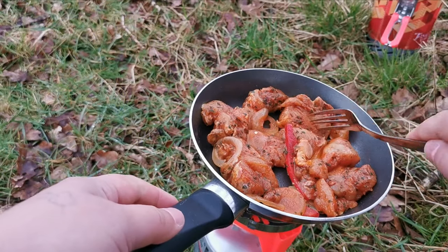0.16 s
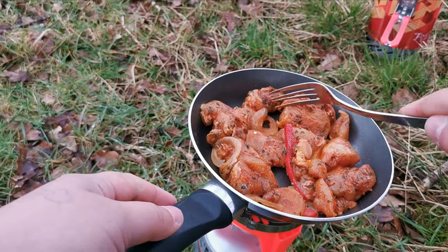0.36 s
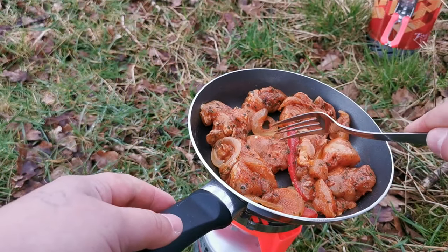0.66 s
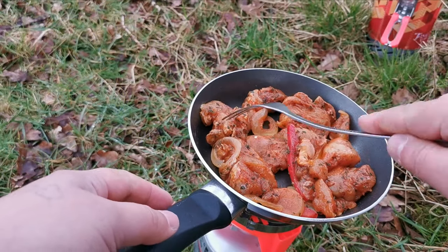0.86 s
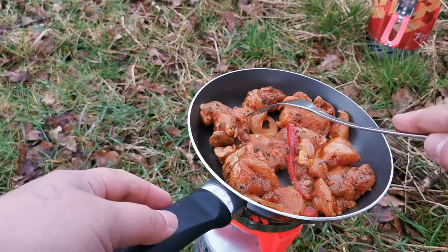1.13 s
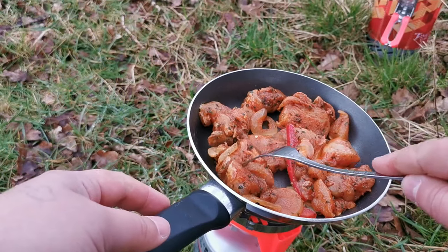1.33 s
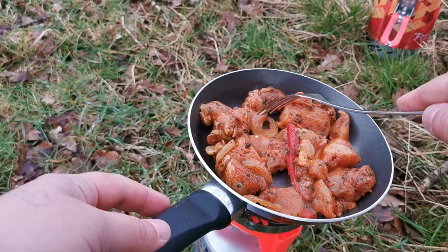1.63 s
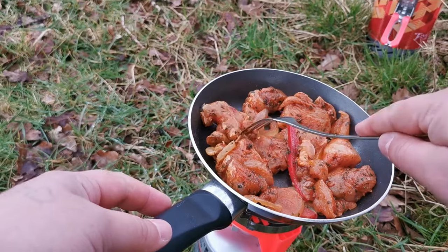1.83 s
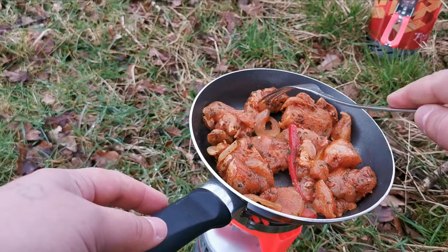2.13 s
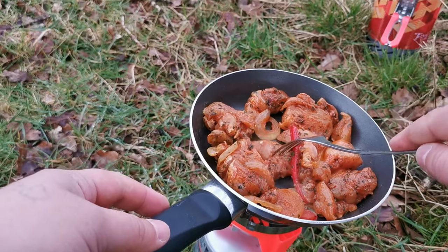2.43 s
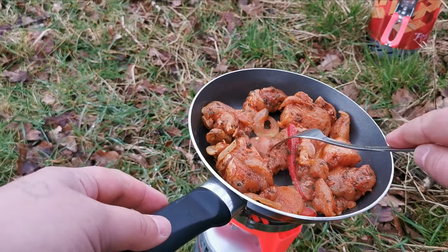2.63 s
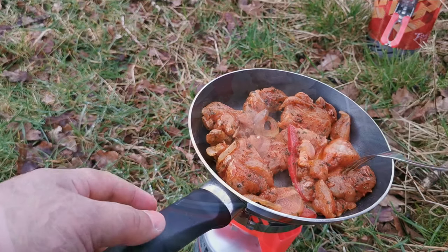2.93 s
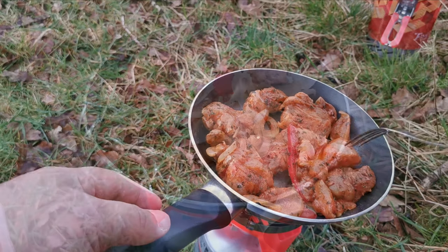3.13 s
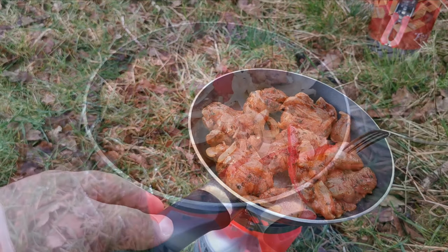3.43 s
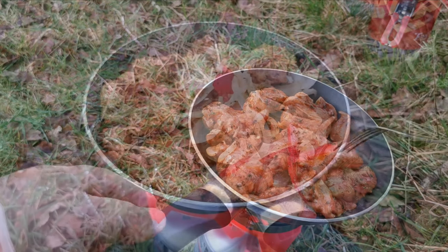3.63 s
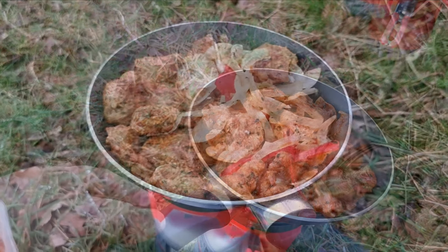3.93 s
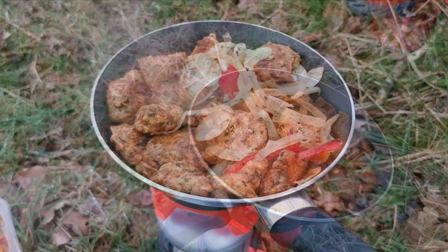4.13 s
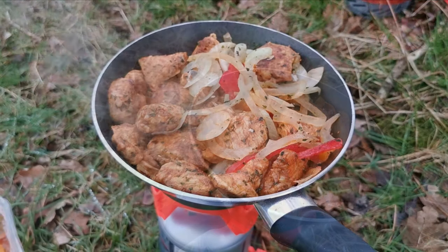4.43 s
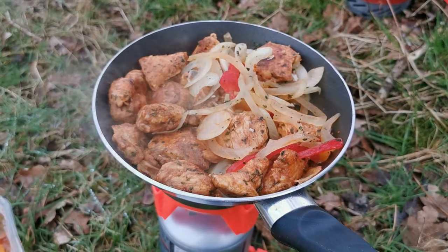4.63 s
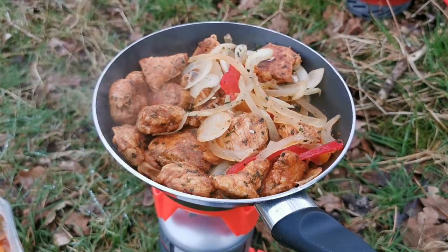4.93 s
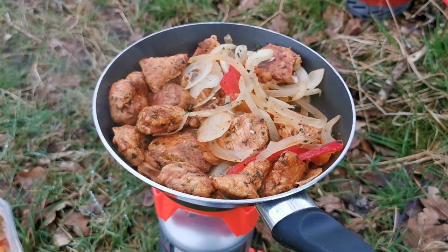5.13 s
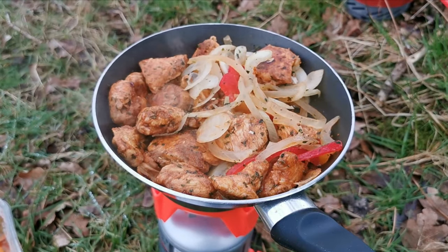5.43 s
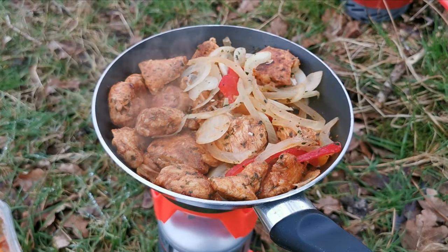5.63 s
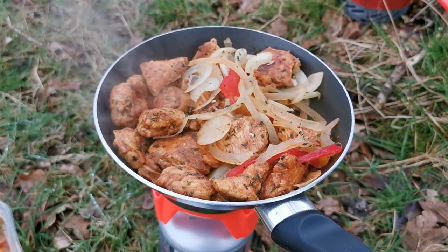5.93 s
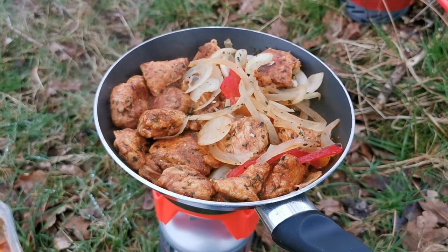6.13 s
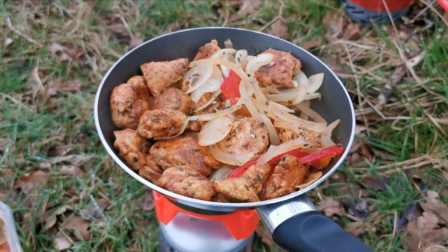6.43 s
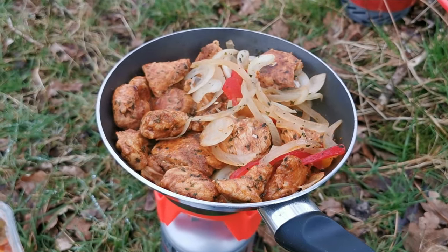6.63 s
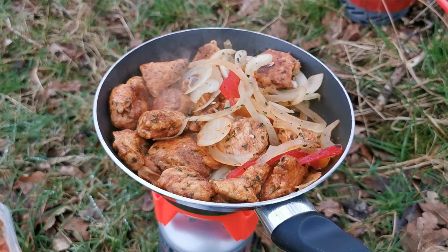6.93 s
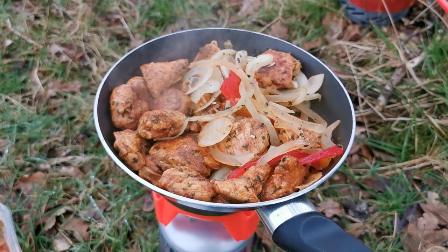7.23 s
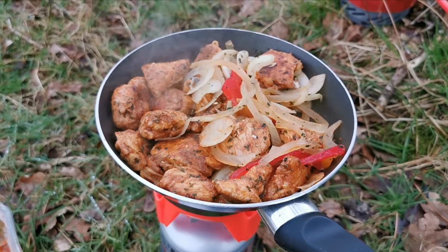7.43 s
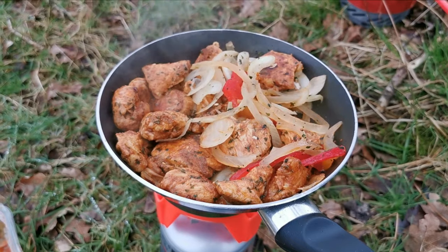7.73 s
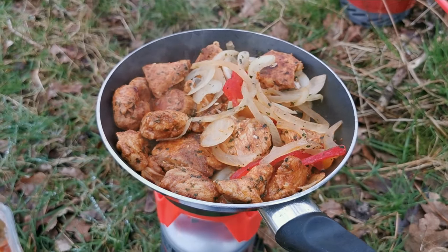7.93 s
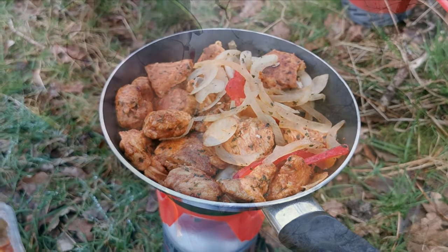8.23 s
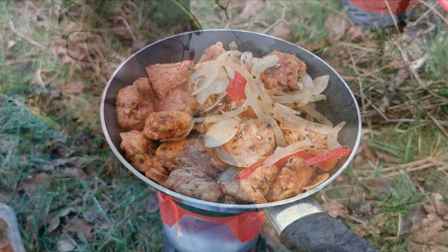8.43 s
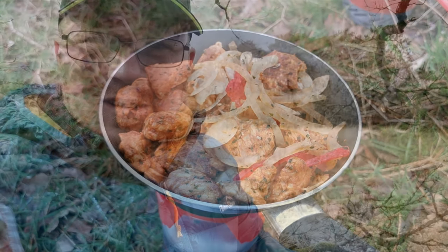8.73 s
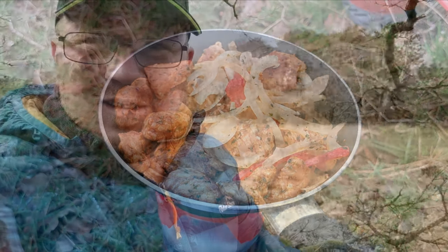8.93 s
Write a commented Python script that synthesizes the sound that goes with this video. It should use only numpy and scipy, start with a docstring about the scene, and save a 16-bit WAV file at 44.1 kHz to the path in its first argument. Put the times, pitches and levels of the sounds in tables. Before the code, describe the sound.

Two views of frying on a portable burner on grass. First a quiet, centred, muffled sizzle over an airy flame, with sparse ticks and thin gritty fork presses. Then, suddenly, a near and wide stereo sizzle: fat snaps and crackles constantly while the flame roars and flutters low, leaning left. Finally, after a short silence, very faint low wind on the microphone.

```python
"""A quiet sizzle from further off, then a close one with a roaring, humming flame, then wind on the microphone.
Meat fries in a small pan on a gas stove on the grass, in three shots parted by short silences.
Flame and wind are filtered noise; the flame's hum is a wavering tone and its octave.
Spitting fat is many short rings in clumps over a fizz; pops and ticks add a snap, a thud and a spray.
In the far shot a fork also presses the meat, and gritty noise flares in narrow gliding bands."""
import sys
import numpy as np
from scipy import signal
from scipy.fft import rfft, irfft, next_fast_len
from scipy.io import wavfile

SR = 44100
rng = np.random.default_rng(int(sys.argv[2]) if len(sys.argv) > 2 else 0)


def transcribe(u):
    """Save the signal u as a 16-bit wav file named by the first command-line argument.

    u: samples, shape (n,) or (channels, n), limited to [-1, 1]; the rate is SR.
    q: integer samples, one column per channel.
    """
    v = np.clip(np.atleast_2d(u).T, -1, 1)
    q = np.round(v * 32767).astype(np.int16)
    wavfile.write(sys.argv[1], SR, q)


def convert_level_to_amplitude(level_db):
    """Map a level in decibels to its linear amplitude factor."""
    exponent = np.asarray(level_db, float) / 20
    return 10 ** exponent


N = 399987     # samples in the whole scene

# shots: (start [s], end [s])
FAR_SHOT, NEAR_SHOT, AIR_SHOT = (0, 3.767), (3.799, 8.866), (8.9, 9.07)
RIGHT_LAG_MS = 0.259     # the right microphone hears the pan later


def rms_one(x):
    """Scale so that the mean of the channels has rms 1."""
    mono = np.mean(np.atleast_2d(x), axis=0)
    return x / np.sqrt(np.mean(mono ** 2) + 1e-20)


def span(shot):
    """Sample times of a shot, in seconds."""
    return np.arange(round(shot[0] * SR), min(round(shot[1] * SR), N)) / SR


def in_time(rows, t):
    """Columns of a table read at times t, with straight lines between the rows."""
    s, *columns = np.transpose(rows)
    return [np.interp(t, s, c) for c in columns]


def drift(rate, count):
    """Slow random wandering of spread 1: noise at every 40th sample through two equal low-passes at rate Hz."""
    r = np.exp(-80 * np.pi * rate / SR)
    noise = rng.standard_normal(count // 40 + 2002)
    slow = signal.lfilter([1], [1, -2 * r, r * r], noise)[2000:]     # the start-up is dropped
    return np.interp(np.arange(count) / 40, np.arange(len(slow)), rms_one(slow))


def narrow(phase, blur_hz):
    """Noise in a narrow band that rides on the given phase."""
    return drift(blur_hz, len(phase)) * np.cos(phase) + drift(blur_hz, len(phase)) * np.sin(phase)


def late(x, ms):
    """Delay by ms milliseconds, read between samples."""
    n = np.arange(len(x))
    return np.interp(n - ms * SR / 1000, n, x, left=0)


def colour(x, table, below_db, above_db):
    """Causal (minimum-phase) filter, one output per dB column; outside the table it slopes by dB per octave."""
    size = 8192
    octave = np.log2(np.maximum(np.fft.rfftfreq(size, 1 / SR), 5))
    hz, *columns = np.transpose(table)
    known = np.log2(hz)
    slope = below_db * np.maximum(known[0] - octave, 0) + above_db * np.maximum(octave - known[-1], 0)
    gain_db = np.array([np.interp(octave, known, c) for c in columns]) + slope
    # folding the cepstrum forward in time gives the minimum phase
    cepstrum = irfft(np.log(convert_level_to_amplitude(gain_db)))
    cepstrum[:, 1:size // 2] *= 2
    cepstrum[:, size // 2 + 1:] = 0
    response = irfft(np.exp(rfft(cepstrum)))
    x = np.atleast_2d(x)
    return signal.oaconvolve(x, response, axes=1)[:, :x.shape[1]]


def still_air():
    """Wind rumble, mostly shared, over the microphones' own faint hiss: one noise colour holds both."""
    # colour of wind and hiss: (frequency [Hz], level [dB])
    air_colour = [(12, -36), (20, -18), (63, -9), (166, -35), (185, -31.5), (452, -40), (519, -30),
                  (649, -38), (2760, -44), (3170, -52), (6020, -44), (7950, -55), (13100, -56),
                  (15500, -59)]
    t = span(AIR_SHOT)
    noise = rng.standard_normal((2, len(t) + SR))
    mid, side = colour(noise, air_colour, below_db=0, above_db=1.0)[:, SR:]
    side = signal.lfilter([1, -1], [1, -.95], side) + convert_level_to_amplitude(-25) * side     # the channels part above the bass
    return convert_level_to_amplitude(-62.5) * rms_one(mid + side * [[1], [-1]])


def far_flame(t):
    """The distant flame: noise whose strength wanders, coloured by the way past pan and ground, plus a drone."""
    # colour on the way past pan wall and ground: (frequency [Hz], level [dB])
    flame_colour = [(30, -20.5), (90, -14.5), (150, -21.5), (200, -5), (250, -9.5), (390, -2.3), (520, -10),
                    (650, -17), (830, -13), (940, -1), (1060, -7), (1270, 0.4), (1500, -10), (1750, -17.5),
                    (2400, -13), (2750, -22.5)]
    roar = rng.standard_normal(len(t)) * convert_level_to_amplitude(1.0 * drift(12.6, count=len(t)))
    flame = rms_one(colour(roar, flame_colour, below_db=7.0, above_db=-18.0))
    drone = narrow(2 * np.pi * 203 * t, blur_hz=2.3)     # a thin drone of the burner at 203 Hz
    return flame + convert_level_to_amplitude(-19.5) * drone


def near_flame(t):
    """The close flame: its roar comes from one place, so the channels largely agree; the right is later."""
    # colour on the way past pan wall and ground: (frequency [Hz], left level [dB], right level [dB])
    flame_colour = [(24.8, -13, -19), (55.5, -1.5, -12.5), (86, -10.5, -17), (127, -5.5, -12.5),
                    (178, -7.5, -15.5), (264.4, -5.5, -9.5), (383, -29.5, -24), (412, -14.5, -34),
                    (505, -14.0, -19), (883, -5, -6.5), (1004, -7.5, -9.5), (1166, -16, -19),
                    (1526, -15.5, -12.5), (1745, -31.5, -23), (1966, -14.5, -20)]
    roar, apart = rng.standard_normal((2, len(t))) * convert_level_to_amplitude(1.14 * drift(12.0, count=len(t)))
    roar = np.array([roar, late(roar, 0.19) + convert_level_to_amplitude(-12.5) * apart])
    return rms_one(colour(roar, flame_colour, below_db=-7.0, above_db=-31.5))


def hum(t):
    """The flame flutters at a pitch and its octave; each flickers on its own and jitters in phase, nearer the left."""
    # hum before jitter and flicker: (time [s], pitch [Hz], level [dB])
    hum_course = [(3.81, 137, -56), (4.02, 136, -52.5), (4.08, 141.5, -57), (5.23, 135.9, -48),
                  (5.34, 129.7, -51.5), (5.47, 140.3, -50), (5.67, 117.6, -58), (5.74, 124.6, -46.5),
                  (5.96, 126.1, -51.5), (6.34, 117.8, -59), (6.45, 133.6, -48.5), (6.71, 138.5, -55.5),
                  (7.4, 133.9, -51), (7.48, 139.2, -64), (7.83, 130.7, -47.5), (8.86, 137.9, -57.5)]
    hz, level_db = in_time(hum_course, t)

    def flicker(swing_db):
        """A wandering strength whose swells stop at 1.3 spreads."""
        return convert_level_to_amplitude(level_db + swing_db * np.minimum(drift(5.8, count=len(t)), 1.3))

    phase = 2 * np.pi * np.cumsum(hz + 5.09 * drift(15.32, count=len(t))) / SR
    octave_phase = 2 * phase + 1.05 * drift(20.5, count=len(t))
    first = np.sqrt(2) * flicker(3.5) * np.sin(phase)
    second = np.sqrt(2) * convert_level_to_amplitude(-1.5) * flicker(4.5) * np.sin(octave_phase)
    # the column of two gains is left, right
    return convert_level_to_amplitude([[3.5], [-4.2]]) * first + convert_level_to_amplitude([[2.2], [-2.2]]) * second


def flares(t):
    """The fork presses the meat: gritty noise in narrow bands glides together, with attack, sagging hold, release."""
    # presses: (time [s], length [s], level of the peak before grit and resonances [dB],
    #           main resonance at start [Hz], main resonance at end [Hz])
    presses = [(0.841, 0.14, -67, 4400, 4410), (1.02, .33, -73, 4370, 4300),
               (2.045, 0.053, -79, 4150, 4400), (2.61, 0.054, -74, 4500, 4400),
               (2.692, .12, -73, 4280, 4240), (2.929, 0.49, -66, 4490, 4100)]
    # resonances of the hollows under the meat: (multiple of the main one [ratio], level [dB])
    hollow_modes = [(.76, -7), (1.0, 3.5), (1.2, -6), (1.319, 1.5), (1.45, -10), (1.58, -17), (2.15, -22)]
    out = np.zeros(len(t))
    for s, length, top_db, from_hz, to_hz in presses:
        on = (t > s) & (t < s + length)
        done = (t[on] - s) / length     # share of the flare gone by
        hz = from_hz + (to_hz - from_hz) * done
        level_db = top_db + np.interp(done, [0, 0.23, 0.85, 1], [-9, 0, -5.5, -9])
        phase = 2 * np.pi * np.cumsum(hz) / SR
        grit = convert_level_to_amplitude(level_db + 2.4 * drift(120.0, count=len(hz))) / np.sqrt(2)
        for multiple, mode_db in hollow_modes:
            out[on] += grit * convert_level_to_amplitude(mode_db) * narrow(multiple * phase, blur_hz=170 * multiple)
    return out


def dying_ring(hz, cycles):
    """A sine of height about 1 that dies by 60 dB in the given number of cycles."""
    turns = np.arange(int(cycles * SR / hz) + 2) * hz / SR
    return np.sin(2 * np.pi * turns) * convert_level_to_amplitude(-60 * turns / cycles)


def spitting(count, per_s, size_db, top_db, clump_db, fizz_db, spray_db, spray_ms, lags_s):
    """Cracks with dying sprays clump over a steadier fizz; each spot of the pan has its own pitch and lags.

    per_s is the rate before clumping; lags_s has one row per spot and one column per channel.
    """
    sizes = convert_level_to_amplitude(np.minimum(size_db * rng.exponential(1, count), top_db))
    clumps = convert_level_to_amplitude(clump_db * (drift(7.0, count) + .7 * drift(35.0, count)))
    cracks = sizes * (rng.random(count) < per_s * clumps / SR)
    spray = signal.lfilter([convert_level_to_amplitude(spray_db)], [1, -np.exp(-1000 / (spray_ms * SR))], cracks)
    cracks = cracks * rng.choice([-1, 1], count) + spray * rng.standard_normal(count)
    fizz = convert_level_to_amplitude(fizz_db) * clumps ** 0.18 * rng.standard_normal(count)
    spot = rng.integers(0, len(lags_s), count)
    busy = spot[np.arange(count) // 100 * 100]     # cracks and sprays keep to one spot for 100 samples
    size = next_fast_len(count + 512)
    hz, out, power = np.fft.rfftfreq(size, 1 / SR), 0, 1e-9
    for k, pitch in enumerate(np.geomspace(1800, 15000, num=len(lags_s))):
        ring = rfft(dying_ring(pitch, cycles=2.6), size) * pitch
        power = power + np.abs(ring) ** 2
        here = rfft(fizz * (spot == k) + cracks * (busy == k), size)
        lag = np.exp(-2j * np.pi * np.outer(lags_s[k], hz))
        out = out + here * ring * lag
    return irfft(out / np.sqrt(power), size)[:, :count]     # all pitches together are white


def pop_rows(t, sizzle_db, per_s, above_db, range_db, low_hz, high_hz):
    """The listed pops and ticks within a shot, and random ones within range_db of a level above the sizzle."""
    # the loudest pops and ticks: bursting fat, and probably fork ticks near 2.62 and 2.99 s:
    # (time [s], strength at the pan [dB], pitch [Hz])
    loud_pops_and_ticks = [(0.1785, -34, 4200), (0.2004, -30.5, 4270), (0.7417, -31, 3130),
                           (0.8175, -26, 4610), (0.851, -26.5, 4260), (0.8954, -24, 4320),
                           (1.0535, -28, 4370), (1.26, -25, 4350), (1.3947, -27.5, 4440),
                           (1.723, -28, 5700), (1.8163, -21, 8500), (2.1959, -29, 5940),
                           (2.6195, -17, 4530), (2.9934, -20, 5240), (3.0185, -25, 5660),
                           (3.051, -21, 4730), (3.1158, -23, 4820), (3.2869, -22, 5000),
                           (3.9182, -7, 12900), (4.3148, -5, 7010), (4.338, -7.5, 3530), (4.3797, 0, 3100),
                           (4.4134, 2, 12200), (4.4503, -8, 3400), (4.4634, -6.5, 3306), (4.6792, -2, 6900),
                           (4.8716, -6, 5045), (4.9443, -1, 11500), (5.1115, -3.5, 3276),
                           (5.1344, 0, 12700), (5.2406, -7.5, 3097), (5.243, 3, 12900),
                           (5.2997, -4.5, 3700), (5.3623, -3, 8950), (5.418, -4, 7380), (5.448, -7, 13000),
                           (5.5204, -9, 2995), (5.5206, 4, 12900), (5.5577, -4.5, 4295), (5.567, -2, 6050),
                           (5.7006, -1, 3165), (5.8383, -2, 12760), (5.9538, -10, 6490),
                           (5.9797, 3.5, 3450), (5.9911, 0, 8200), (6.2216, 0, 12550), (6.3555, -5, 6900),
                           (6.436, -4, 3514), (6.6562, -5, 4260), (6.7311, 0, 6740), (6.7467, -5, 3810),
                           (6.8083, -3, 7040), (6.8867, 0.5, 7450), (6.9236, -3, 5600), (6.9518, -2, 7360),
                           (7.0355, -5, 3570), (7.0908, -4, 7970), (7.1454, 4, 13390), (7.3054, 3, 8730),
                           (7.3919, -4, 7370), (7.4178, -2, 7360), (7.5684, -1.5, 8030), (7.6395, -4, 5650),
                           (7.6789, 1, 2900), (7.6833, -5, 2680), (7.7071, -6.5, 3820), (7.716, -2, 7350),
                           (7.7494, -2, 11100), (7.769, -4, 3420), (7.8477, -1.5, 4970),
                           (7.8681, -5.5, 3482), (7.9975, 0, 6450), (8.1003, -6, 3420),
                           (8.1123, -1.5, 8060), (8.2196, -14, 4120), (8.276, -5, 6650)]
    when, size, pitch = rng.random((200, 3)).T
    s = t[0] + when * (t[-1] - t[0])
    strength_db = np.interp(s, t, sizzle_db) + above_db + range_db * (2 * size - 1)
    chance = np.array([s, strength_db, low_hz * (high_hz / low_hz) ** pitch]).T
    listed = [row for row in loud_pops_and_ticks if t[0] <= row[0] < t[-1]]
    return listed + list(chance[:int(per_s * (t[-1] - t[0]))])


def pops(rows, t, cycles, snap_hz, snap_db, thud_hz, thud_db):
    """Each pop or tick is a bright snap, a short ring at its pitch, a low thud and a dying spray of noise."""
    out = np.zeros(len(t) + SR)
    snap = convert_level_to_amplitude(snap_db) * dying_ring(snap_hz, cycles=2.1)
    thud = convert_level_to_amplitude(thud_db) * dying_ring(thud_hz, cycles=5.2)
    noise = rng.standard_normal(len(out))
    dying = convert_level_to_amplitude(-18.5 - 60 * np.arange(SR // 40) / (0.01 * SR))     # falls by 60 dB in 10 ms
    for s, peak_db, hz in rows:
        at = round((s + 0.000806 - t[0]) * SR)     # sounds 0.8 ms after its listed time
        octaves = np.log2(hz / 4500)     # away from the middle pitch
        # high ones ring for more cycles and snap more, low ones thud more (dB per octave)
        ring = dying_ring(hz, cycles * convert_level_to_amplitude(4 * octaves))
        spray = np.convolve(dying * noise[at:at + len(dying)], ring / np.sqrt(np.sum(ring ** 2)))
        for part in (ring, spray, convert_level_to_amplitude(0.5 * octaves) * snap, convert_level_to_amplitude(-13 * octaves) * thud):
            out[at:at + len(part)] += convert_level_to_amplitude(peak_db) * part
    return out[:len(t)]


def far_pan():
    """Flame, sizzle, pops, ticks and flares, alike in both channels, over a faint microphone hiss."""
    # levels over time: (time [s], flame level [dB], sizzle level [dB])
    far_levels = [(0.0, -62.5, -69), (1.1, -63, -68), (1.6, -62.5, -70), (2.6, -63, -68), (2.9, -63, -74),
                  (3.1, -64, -68.5), (3.58, -66.2, -72.5), (3.767, -70, -75.5)]
    # colour on the way past pan wall and ground: (frequency [Hz], level [dB])
    sizzle_colour = [(1750, -32), (2400, -15), (2750, -26.5), (3250, -11), (3750, -21.5), (4350, -12),
                     (5200, -21.5), (5700, -12), (6400, -19.5), (7000, -17), (8000, -28.5), (10000, -39),
                     (12000, -43), (15500, -46)]
    t = span(FAR_SHOT)
    flame_db, sizzle_db = in_time(far_levels, t)
    spit = spitting(len(t), 700, size_db=5.0, top_db=10, clump_db=2.5, fizz_db=-10,
                    spray_db=-25.5, spray_ms=1.8, lags_s=np.zeros((12, 1)))
    sizzle = rms_one(colour(spit, sizzle_colour, below_db=-16.0, above_db=2.5))
    rows = pop_rows(t, sizzle_db, per_s=4.6, above_db=31.6, range_db=4.6, low_hz=3000, high_hz=6000)
    popping = pops(rows, t, cycles=5.4, snap_hz=8500, snap_db=-5.0, thud_hz=2090, thud_db=-9.0)
    popping = colour(popping, sizzle_colour, below_db=-4, above_db=-1.5)
    # mostly shared hiss, with a little of its own in each channel
    hiss = convert_level_to_amplitude(-94) * (rng.standard_normal(len(t)) + convert_level_to_amplitude(-12) * rng.standard_normal((2, len(t))))
    return convert_level_to_amplitude(flame_db) * far_flame(t) + convert_level_to_amplitude(sizzle_db) * sizzle + popping + flares(t) + hiss


def through_pan(source, below_db, ring_cycles, ring_db):
    """The pan rings at its strongest mode, an echo comes off its wall, and the way to each microphone colours both."""
    # colour on the way past pan wall and ground: (frequency [Hz], left level [dB], right level [dB])
    sizzle_colour = [(1770, -21.5, -24.5), (1940, -14, -27), (2017, -20, -11.5), (2460, -15, -10.5),
                     (3140, -12.5, -14.5), (4130, -10, -19), (4350, -16, -15), (5470, -13.5, -19.5),
                     (6780, -12, -19.5), (7730, -12.5, -44), (8740, -16, -36), (9240, -16, -22.5),
                     (10000, -25.5, -26), (11300, -23, -27.5), (12900, -25.5, -23.5), (14800, -22.5, -24.5),
                     (15600, -32, -34.5)]
    ring = convert_level_to_amplitude(ring_db) * dying_ring(3160, ring_cycles)
    source = source + signal.oaconvolve(source, ring[None], axes=1)[:, :source.shape[1]]
    dull = signal.lfilter([.3], [1, -.7], source)     # the wall returns mostly the lower treble
    left_echo = 0.72 * late(dull[0], 1.63)
    right_echo = 0.028 * late(dull[1], 2.92)
    return colour(source + np.array([left_echo, right_echo]), sizzle_colour, below_db, above_db=-16.0)


def near_pan():
    """Close flame, hum and pops; the spitting is spread over the pan, so its channels part in the treble."""
    # levels over time: (time [s], flame level [dB], sizzle level [dB])
    near_levels = [(3.8, -46, -47.5), (4.0, -45, -44.5), (4.75, -41, -42), (6.1, -42, -41),
                   (7.9, -42, -41.5), (8.35, -43, -42), (8.866, -48, -46.5)]
    t = span(NEAR_SHOT)
    flame_db, sizzle_db = in_time(near_levels, t)
    # 14 spots, scattered evenly with spread 1 by golden-ratio steps
    places = np.sqrt(3) * (2 * (np.arange(14) * (np.sqrt(5) - 1) / 2 % 1) - 1)
    lags_ms = np.array([0 * places, RIGHT_LAG_MS + 0.053 * places]).T
    spit = spitting(len(t), 1200, size_db=4.0, top_db=6.0, clump_db=2.08, fizz_db=-9,
                    spray_db=-27.5, spray_ms=2.14, lags_s=lags_ms / 1000)
    sizzle = rms_one(through_pan(spit, below_db=-9, ring_cycles=6.5, ring_db=-32.5))
    rows = pop_rows(t, sizzle_db, per_s=20, above_db=33, range_db=2.8, low_hz=2600, high_hz=12600)
    popping = pops(rows, t, cycles=5.74, snap_hz=9494, snap_db=-5.0, thud_hz=1020, thud_db=-18)
    popping = np.array([popping, late(popping, RIGHT_LAG_MS)])
    popping = through_pan(popping, below_db=1.5, ring_cycles=53, ring_db=-37)
    return convert_level_to_amplitude(flame_db) * near_flame(t) + convert_level_to_amplitude(sizzle_db) * sizzle + popping + hum(t)


def scene():
    """The three shots in turn, with hard cuts to and from the silences between them."""
    out = np.zeros((2, N))
    for shot, sound in ((FAR_SHOT, far_pan()), (NEAR_SHOT, near_pan()), (AIR_SHOT, still_air())):
        at = round(shot[0] * SR)
        out[:, at:at + sound.shape[1]] = sound
    return out


def roll_off(x):
    """The treble ends steeply here."""
    return signal.sosfilt(signal.butter(12, 16380, fs=SR, output="sos"), x)


def record(dry):
    """A steep low-pass removes the top above 15810 Hz from the finished mix."""
    low_pass = signal.ellip(12, .5, 65, 15810, fs=SR, output="sos")
    mix = signal.sosfilt(low_pass, dry)
    return roll_off(mix)


dry = scene()
out = record(dry)
transcribe(out)
```